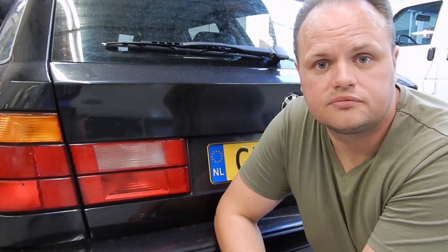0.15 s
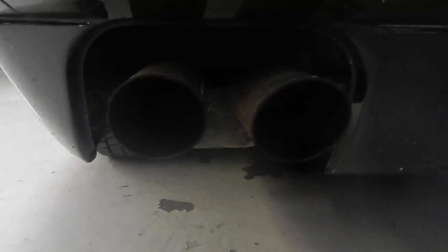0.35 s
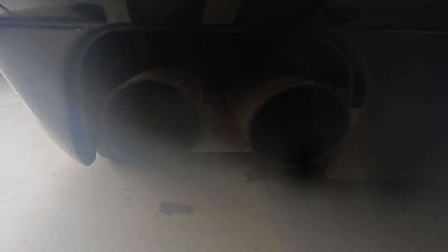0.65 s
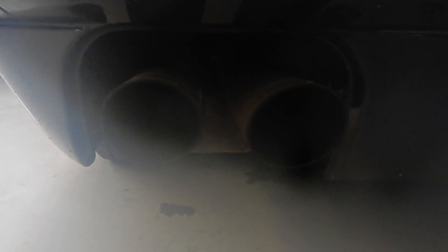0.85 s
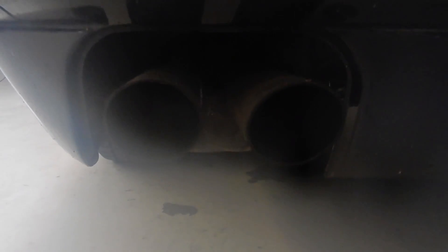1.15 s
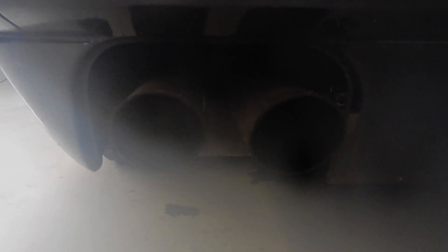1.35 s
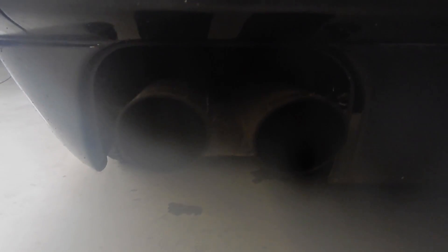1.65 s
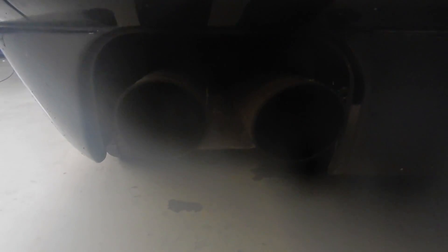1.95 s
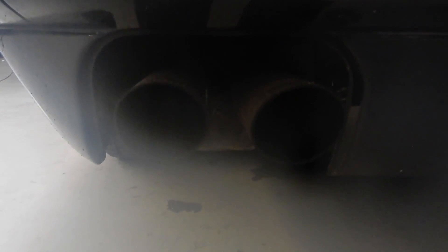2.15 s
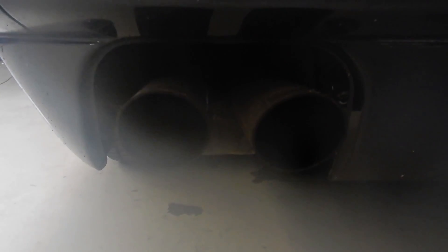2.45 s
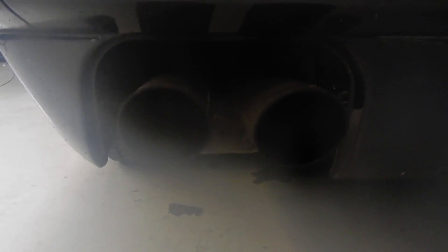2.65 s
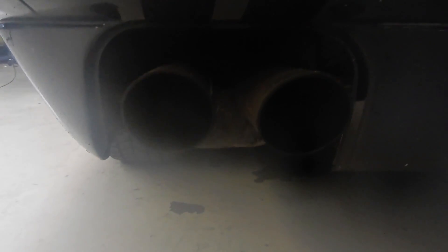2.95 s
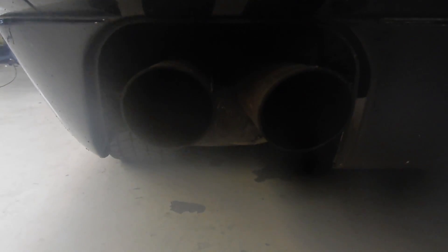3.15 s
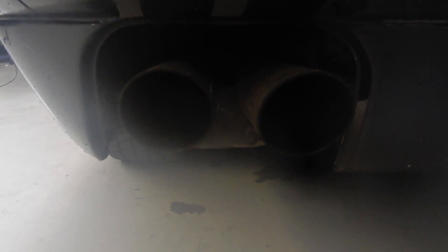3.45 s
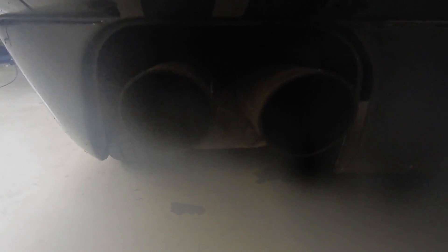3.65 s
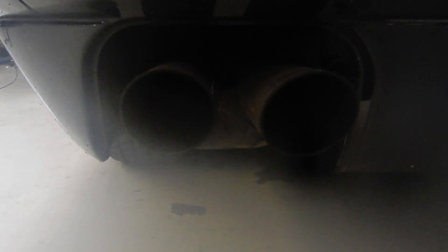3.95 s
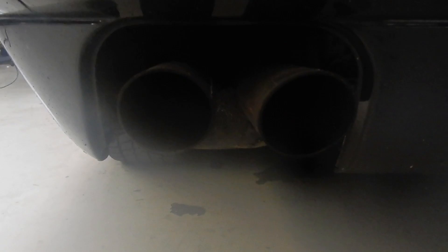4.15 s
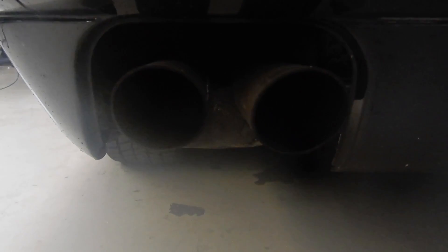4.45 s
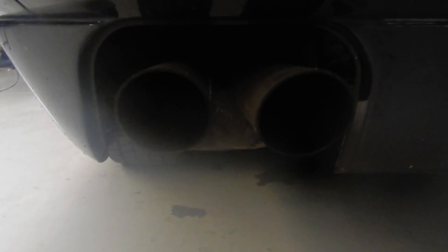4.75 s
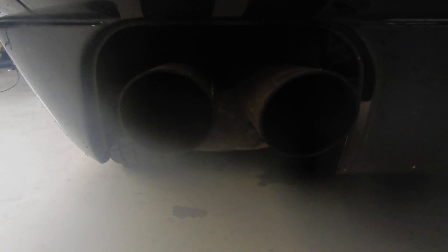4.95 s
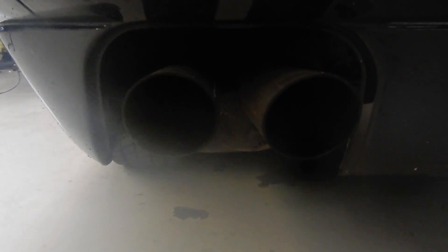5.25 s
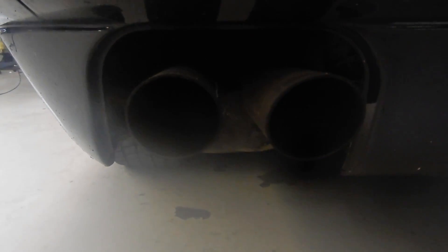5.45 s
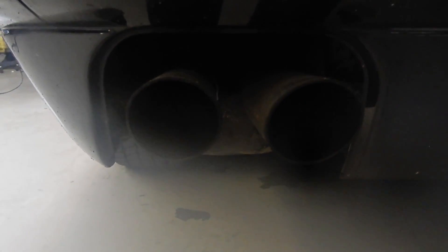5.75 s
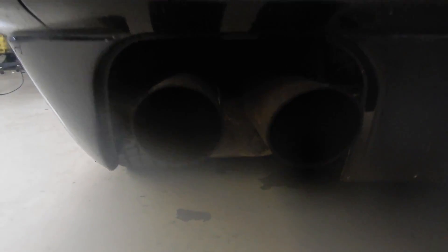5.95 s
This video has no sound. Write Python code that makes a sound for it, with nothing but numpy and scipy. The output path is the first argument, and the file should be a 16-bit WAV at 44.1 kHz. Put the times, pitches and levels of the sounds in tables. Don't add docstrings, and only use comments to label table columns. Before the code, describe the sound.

Just behind a car's twin tailpipes, the engine idles unevenly. Low, quick burbles give way to repeated misfire thumps, about six a second, each with a chuff and then a ragged gust hitting the stereo microphone. A smooth burbling stretch comes midway, more thumps follow in broken groups, and even firing returns at the end. Steady gas and engine hiss lies underneath, its level dipping after loud puffs and creeping back.

```python
import sys
import numpy as np
from scipy import signal
from scipy.fft import rfft, irfft
from scipy.io import wavfile
from scipy.ndimage import uniform_filter1d

SR = 44100
rng = np.random.default_rng(int(sys.argv[2]) if len(sys.argv) > 2 else 0)


def unload_wav(signal):
    wavfile.write(
        sys.argv[1],
        SR,
        np.round(np.clip(np.atleast_2d(signal).T, -1, 1) * 32767).astype(np.int16),
    )


def volts(x):
    e = np.asarray(x, float) / 20
    return 10 ** e


N = 268524


def evened(x):
    return x / np.sqrt(np.mean(x ** 2) + 1e-20)


def read(points, hz):
    f, value = np.transpose(points)
    return np.interp(np.log(hz + 1), np.log(f + 1), value)


def add(mix, s, sound):
    part = mix[round(s * SR):][:len(sound)]
    part += sound[:len(part)]


def colour(x, level_rule):
    hz = np.fft.rfftfreq(x.shape[-1], 1 / SR)
    return irfft(rfft(x) * volts(level_rule(hz)), x.shape[-1])


def resonate(x, hz, width):
    turn = np.exp(2j * np.pi * hz * np.arange(N) / SR)
    r = np.exp(-np.pi * width / SR)
    return 2 * (turn * signal.lfilter([1 - r], [1, -r], x / turn)).real


# first firing t/s, spacing t/s, number of firings
CLEAN_RUNS = [
    (.367, .052, 3),
    (1.043, .055, 3),
    (3.101, .0522, 9),
    (3.907, .0545, 3),
    (4.579, .0555, 3),
    (5.254, .0521, 12),
]
CLEAN_RUN_DB = (-1.5, 1, 5, 0.3, -4, 1)
CYLINDERS = (0, 3, 4)
CYLINDER_DB = (-1.5, 1.5, -2)
# pressure trough t/s, strength level/dB
MISFIRES = [(.538, 1), (0.704, -.3), (.88, 1.2), (1.222, 0), (1.393, 0.5), (1.564, 1.5), (1.737, 0.7),
            (1.908, -0.6), (2.079, .3), (2.253, 0.5), (2.424, 2), (2.596, 0.2), (2.769, 1), (2.939, .3),
            (3.585, 1.5), (3.753, 0.5), (4.085, 0.1), (4.252, 0.5), (4.425, 0), (4.757, 1.5), (4.925, 1.2),
            (5.094, 1.5)]
# delay t/s, level/dB, kind of slug, hiss level/dB, hiss delay t/s
AFTERMATH = [
    (0, -14.5, 1, 6, -.002),
    (.0545, -25, 2, 13, -.010),
    (.0875, -28, 2, -5, .0),
    (.114, -29, 0, -3, .0),
]


def firings():
    strokes = []
    for (start, gap, count), run_db in zip(CLEAN_RUNS, CLEAN_RUN_DB):
        for k in range(round(count)):
            s, cylinder = start + k * gap, k % len(CYLINDERS)
            db = -26 + run_db + CYLINDER_DB[cylinder]
            strokes.append((s, db, CYLINDERS[cylinder], 1.5, s + 0.0032))
    for s, hard_db in MISFIRES:
        for delay, db, kind, hiss_db, late in AFTERMATH:
            strokes.append((s + delay, db + hard_db, kind, hiss_db + hard_db, s + delay + late))
    return strokes


# f/Hz, level/dB
HISS = [(53, -21.5), (90, -0.5), (109, 0.5), (176, 2.5), (259, -4.5), (328, -12), (483, -17.5),
        (1010, -26.5), (1190, -21), (1330, -33), (2540, -31), (2770, -30), (11000, -46), (11700, -46),
        (15500, -51.5)]
# f/Hz, side minus mid level/dB
WIDTH = [(60, 1), (150, -24), (380, -18.5), (950, -18), (2380, -14), (5980, -6), (15000, 0.5)]
# f/Hz, width f/Hz, level/dB
RINGS = [(1100, 32, -87), (2194, 56, -65.5), (2440, 40, -74), (3740, 110, -73), (4760, 29, -76)]
# f/Hz, level/dB
WHINES = [(7693, -76), (8060, -81), (9157, -77), (9286, -80), (9644, -83), (10255, -82), (11612, -78),
          (13329, -86)]


def engine(strokes):
    a, b = rng.standard_normal((2, N))
    apart = colour(b, lambda hz: read(WIDTH, hz))
    bed = colour(np.array([a + apart, a - apart]),
                 lambda hz: read(HISS, hz) - 3.96 * (hz < 320) - 2.1 * (hz > 12300))

    chuffs, t = np.zeros(N), np.linspace(-.03, .03, 2646)
    for *_, hiss_db, s in strokes:
        level = volts(hiss_db + 0.63 * rng.standard_normal())
        add(chuffs, s - .03, level * np.exp(-.5 * (t / 0.0081) ** 2))

    def band(hz):
        below = 12 * np.log2(np.clip(hz, 1, 2000) / 2000)
        above = 10.7 * np.log2(np.clip(hz, 4200, None) / 4200)
        return below - above

    jet = colour(rng.standard_normal(N), lambda hz: read(HISS, hz) + band(hz))
    jet = jet + 1.1 * resonate(jet, 2480, 350)
    grain = volts(2.2 * evened(uniform_filter1d(rng.standard_normal(N), size=300)))
    gain = gain_db()
    rush = volts(-5 + 0.62 * gain)
    upper = volts(-10.5 + 0.89 * gain) * colour(jet, lambda hz: -40. * ((hz < 3300) | (hz > 5200)))
    flow = (volts(-8.5) * chuffs * grain ** 0.41 + rush * grain) * jet
    steady = volts(-34.5) * (bed + upper + flow) / np.std(bed)

    rings = sum(volts(db) * evened(resonate(a, hz, width)) for hz, width, db in RINGS)
    whines = sum(volts(db + 3.0) * evened(resonate(resonate(b, hz, 40), hz, 40)) for hz, db in WHINES)
    return steady + rings * (1 + 0.31 * chuffs) + whines


# t/s, level/dB
TICK = (5.4555, -19)
# f/Hz, time to fade by 60 dB t/s, level/dB
TICK_MODES = [(2450, .006, -4), (2800, .009, 0), (3300, .014, -7), (4400, .005, -4.5), (5900, .004, -6),
              (8000, .004, -7.5), (10500, .003, -13), (13500, .003, -19)]


def tick():
    out, t = np.zeros(N), np.arange(900) / SR
    ring = sum(volts(TICK[1] + db - 60 * t / t60) * np.sin(2 * np.pi * hz * t)
               for hz, t60, db in TICK_MODES)
    add(out, TICK[0], ring * (1 - np.exp(-t / .00012)))
    return colour(out, lambda hz: -45 * np.log2(np.clip(2000 / (hz + 1), 1, 8)))


# width t/ms, first arrival share, twin tailpipe share, echoes until faded
SLUGS = [
    (1.15, .55, .75, 2.2),
    (1.7, .95, .75, 2.3),
    (1.8, 1.7, .45, 2.2),
    (1.0, .5, .85, 2.4),
    (2.1, .55, .6, 2.2),
]
RATTLE_DB = (-3, 8, 1, 0.5, -5.5)
# f/Hz, time to fade by 60 dB t/s, level/dB
SILENCER = [(116, 0.44, -36), (170, 0.093, -35.5), (258.2, 0.12, -31.5), (503.7, 0.15, -41.5),
            (749.6, 0.11, -49), (1170, 0.052, -59)]


def pipe(strokes):
    round_trip, twin_delay, lead = .0087, .0047, .0076
    out, t = np.zeros(N), np.arange(7000) / SR - .02
    turn = np.arange(8)[:, None]
    chances = rng.standard_normal((len(strokes), 3, len(SILENCER)))
    for (s, db, kind, *_), chance in zip(strokes, chances):
        width, first, twin, fade = SLUGS[round(kind)]

        def slug(at, spread):
            return np.exp(-.5 * ((t - at) / (width / 1000 * spread)) ** 2)

        at, spread = turn * round_trip - .0015, 1 + 0.016 * turn
        both_pipes = slug(at, spread) + twin * slug(at + twin_delay, spread)
        echoes = (-1.) ** (turn + 1) * np.exp(-(turn / fade) ** 2) * both_pipes
        push = first * slug(-lead - .0015, 1.1) + echoes.sum(0)

        swell = np.clip((t + 0.0076) / 0.01, 0, 1) ** 2
        ring = np.zeros(len(t))
        for (hz, t60, mode_db), p, q, r in zip(SILENCER, *chance):
            level_db = mode_db + RATTLE_DB[round(kind)] * (hz > 400) + 1.8 * p - 60 * t / t60
            ring += volts(level_db) * np.sin(2 * np.pi * (hz * (1 + 0.026 * r) * t + q))
        add(out, s - .02, volts(db + chance[0, 0] / 2) * push + swell * ring)
    return out


# f/Hz, level/dB
BUFFET = [(25, -4.5), (50, -5), (120, 1.5), (227, 4), (412, 1.5), (873, -9.5), (1200, -23.5), (1400, -40),
          (2000, -33.5), (2800, -66), (5000, -88)]


def gust(shape, db, bright_db):
    def tilt(hz):
        return read(BUFFET, hz) + 0.55 * bright_db * np.log2(np.clip(hz, 150, 1300) / 300)

    def steady(x):
        return x * (np.mean(x ** 2) / uniform_filter1d(x ** 2, size=400)) ** 0.43

    white = rng.standard_normal(len(shape))
    low = colour(white, lambda hz: tilt(hz) - 10 * np.log10(1 + (hz / 550) ** 4))
    high = colour(white, tilt) - low
    speed = shape / shape.max()
    noise = steady(low) * speed + 1.51 * steady(high) * speed ** 3.6
    return volts(db) * noise * np.linalg.norm(shape) / np.linalg.norm(noise)


# t/s, level/dB, stay t/ms, brightness level/dB
LEFT_GUSTS = [(.662, -9, 12.6, -11.5), (.813, -9.5, 7.4, 4), (.843, -11.5, 14, -12.5), (.994, -9, 14.6, -4),
              (1.03, -18, 26, -22), (1.345, -16, 30, -15), (1.501, -12.5, 21, 2.5), (1.516, -4.5, 3, 1.5),
              (1.547, -11, 5.3, -29), (1.679, -12.5, 28, -8.5), (1.836, -7.5, 24, 0), (2.016, -12, 24.6, 3),
              (2.183, -7.5, 16.7, 4), (2.361, -11, 16, 3), (2.531, -12, 31, -1), (2.723, -8, 9.9, -1),
              (2.874, -8, 23.6, -1.5), (2.902, -13.5, 7.3, -18), (3.06, -7.5, 8, -8), (3.077, -15, 14, -16),
              (3.731, -13, 2.9, 2.5), (3.864, -15, 31, -9), (4.21, -13.5, 18, 1.5),
              (4.362, -14.5, 37, -8.5), (4.537, -11, 9.4, 5.5), (4.574, -21, 11, -29), (4.897, -15, 21, -7),
              (5.026, -5, 13, -6.5), (5.206, -7.5, 14, -4.5), (5.24, -17, 13, -11)]
# t/s, level/dB, stay t/ms, brightness level/dB
RIGHT_GUSTS = [(.66, -15, 31.6, -3.5), (.808, -11, 8.2, -17), (.837, -12, 18, -14), (.995, -9.5, 22, -4),
               (1.345, -12, 3.6, -11), (1.357, -14, 8.6, -10.5), (1.498, -10, 29, -3.5),
               (1.675, -6, 17, -10.5), (1.835, -9.5, 25, 3.5), (2.017, -5, 18.5, -4),
               (2.184, -3.5, 11, 0.5), (2.36, -2, 5.6, 0), (2.53, -1.5, 11.6, 1.2), (2.72, -9, 22.6, -9),
               (2.852, -19, 10, -13), (2.872, -5.5, 19, -1), (3.06, -3, 5.2, 3), (3.093, -18, 6, -14.5),
               (3.718, -28.5, 5.6, 7), (3.729, -14.5, 10, -16), (3.865, -19.5, 34, -2),
               (4.201, -13.5, 10, 0), (4.213, -7.5, 11.3, -0.5), (4.362, -6, 25.4, -8),
               (4.531, -2.5, 9.4, -7.5), (4.884, -9, 14, -5), (5.023, -7.5, 20, -5.5), (5.201, -3, 13, -8),
               (5.23, -13, 6.4, -8)]


def puffs():
    rise_ms, tail_db_per_ms = 1.8, 1.08
    lead_in_db, lead_in_ms = -14, 11
    out, ms = np.zeros((2, N)), np.arange(8192) / SR * 1000 - 50
    for port, gusts in enumerate((LEFT_GUSTS, RIGHT_GUSTS)):
        for s, db, stay, bright_db in gusts:
            early, late = np.minimum(ms, 0), np.maximum(ms - stay, 0)
            rise = np.exp(-.5 * (early / rise_ms) ** 2) + volts(lead_in_db) * np.exp(early / lead_in_ms)
            arch_db = 3 * np.sin(np.pi * np.clip(ms / stay, 0, 1) ** 0.59)
            shape = rise * volts(arch_db - tail_db_per_ms * late)
            add(out[port], s + ms[0] / 1000, gust(shape, db - 4.0, bright_db))
    return out - 0.023 * out[::-1]


def scene():
    strokes = firings()
    return engine(strokes) + tick() + pipe(strokes) + puffs()


# t/s, gain just after level/dB
DUCKS = [(.365, 0.3), (.664, 1), (0.815, -3.5), (1.006, -6), (1.515, -11.5), (1.858, -6), (2.022, -5.5),
         (2.192, -10.5), (2.376, -10.5), (2.538, -11.5), (2.889, -7), (3.067, -7.5), (3.878, 2),
         (4.212, -4.5), (4.38, -3), (4.534, -9.5), (5.037, -8), (5.227, -6.5)]


def gain_db():
    hold_s, climb_db_per_s = 0.077, 19.5
    t = np.arange(N) / SR
    s, after_db = np.transpose(DUCKS)
    last = np.clip(np.searchsorted(s, t) - 1, 0, None)
    climb = climb_db_per_s * np.maximum(t - s[last] - hold_s, 0)
    return uniform_filter1d(after_db[last] + 1.5 + climb, size=40)


# t/s, level/dB
CRACKS = [(.814, -41), (0.997, -57), (1.513, -40.5), (1.8472, -43), (2.019, -42), (2.1862, -37),
          (2.3595, -39), (2.5292, -37.5), (2.886, -43), (3.0618, -40), (4.2093, -32), (4.535, -47),
          (5.03, -51)]


def cracks():
    out, t = np.zeros(N), np.arange(400) / SR
    for s, db in CRACKS:
        snap = colour(rng.standard_normal(400),
                      lambda hz: -9.0 * abs(np.log2((hz + 1) / 1900)) - 15 * (hz > 7000))
        add(out, s, volts(db - 2.0) * evened(snap) * np.exp(-t / 0.0029))
    return out * np.array([[.5], [1.4]])


# f/Hz, level/dB from the usual
GATE = [(8500, -30), (9800, -8), (11500, -6.5), (12600, -2), (13600, -5), (14500, -2), (15100, 4),
        (15600, 9)]


def gate(x):
    hz, _, z = signal.stft(x, SR, nperseg=1024)

    def smooth(grid, frames):
        return uniform_filter1d(uniform_filter1d(grid, size=9, axis=0), size=frames, axis=1)

    power = smooth((abs(z) ** 2).mean(0), 3)
    level_db = 10 * np.log10(power + 1e-20)
    patches = evened(smooth(rng.standard_normal(power.shape), 4))
    above_usual = level_db - np.median(level_db, axis=1)[:, None]
    over_db = .65 * above_usual - read(GATE, hz)[:, None] + 3.0 * patches
    shut = (over_db < 0) & (hz[:, None] > GATE[0][0])
    return signal.istft(z * np.where(shut, volts(-30), 1), SR, nperseg=1024)[1][:, :N]


def top_cut(x):
    return signal.sosfilt(signal.butter(12, 15670, fs=SR, output="sos"), x)


def record(dry):
    start, stop = .3645, 5.8495
    t = np.arange(N) / SR
    bass_cut = signal.lfilter(*signal.butter(1, 21 / (SR / 2), "high"), dry)
    loud = bass_cut * volts(gain_db()) + cracks()
    loud = loud / (1 + (loud / .96) ** 4) ** .25
    cut = np.clip((t - start) / 0.0016, 0, 1) * np.clip((stop - t) / 0.0007, 0, 1)
    return top_cut(gate(loud) * cut)


dry = scene()
out = record(dry)
unload_wav(out)
```